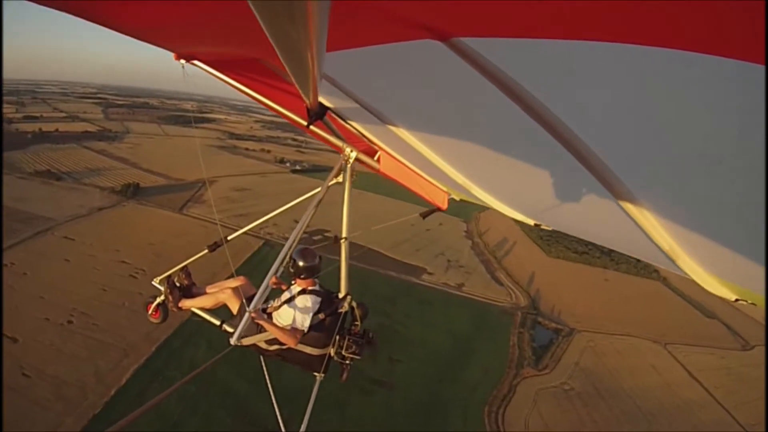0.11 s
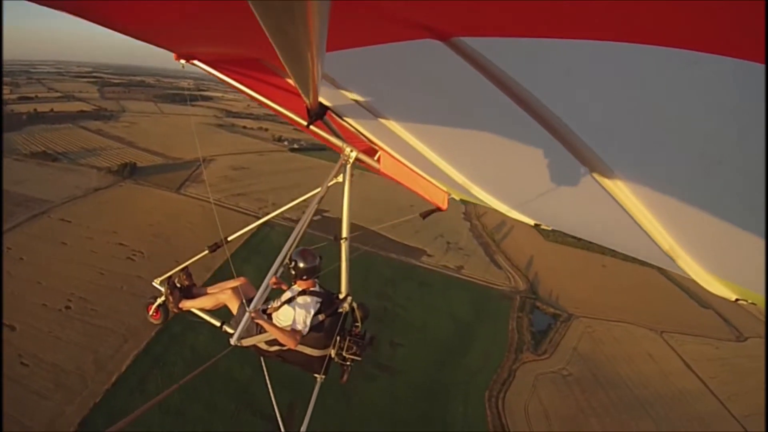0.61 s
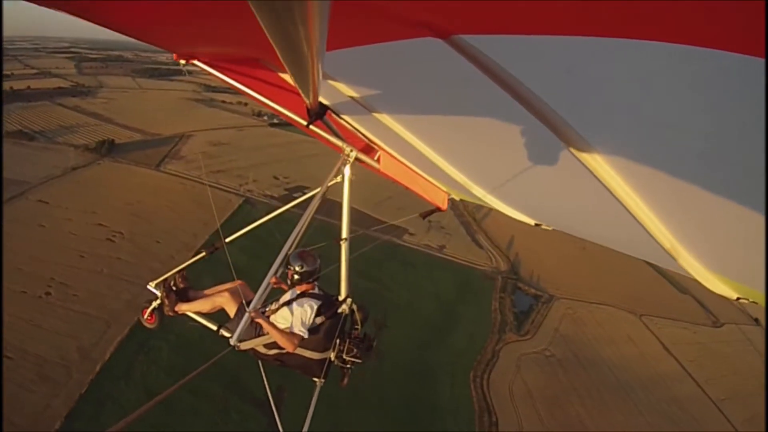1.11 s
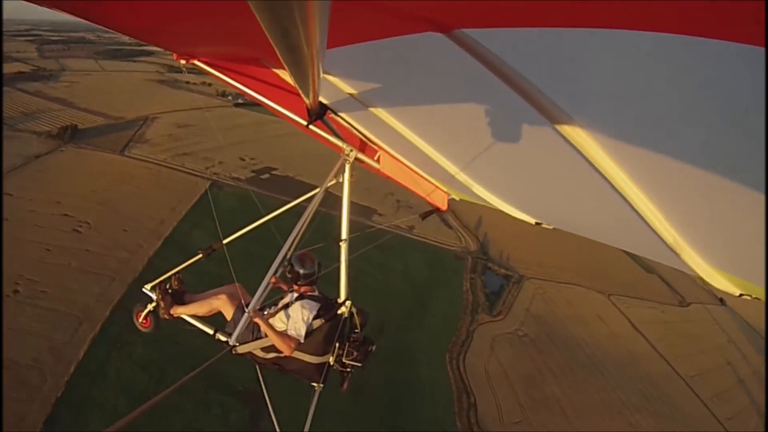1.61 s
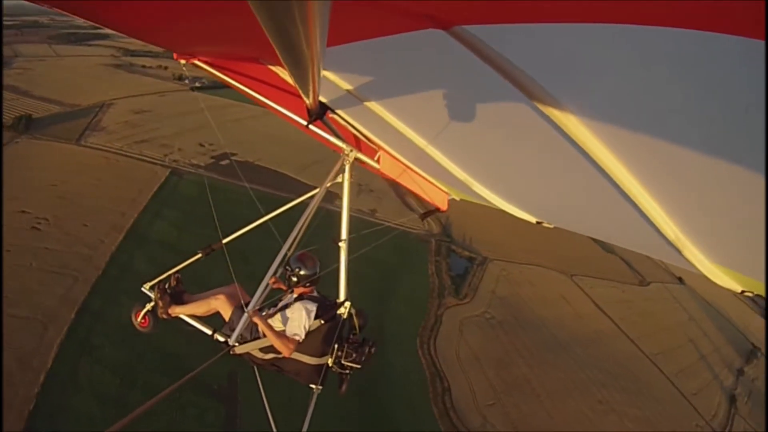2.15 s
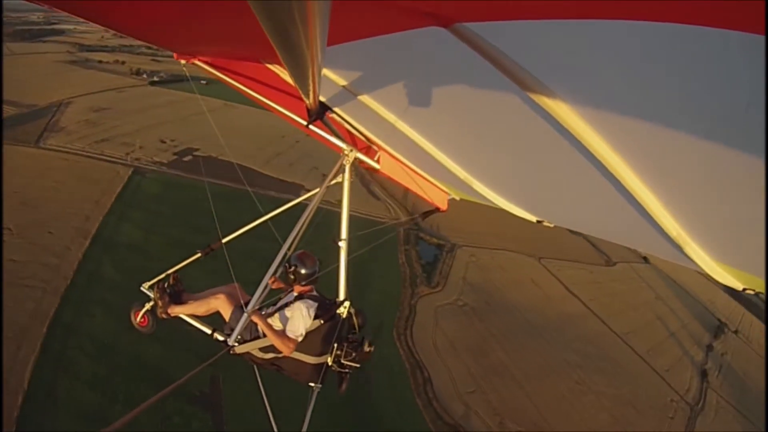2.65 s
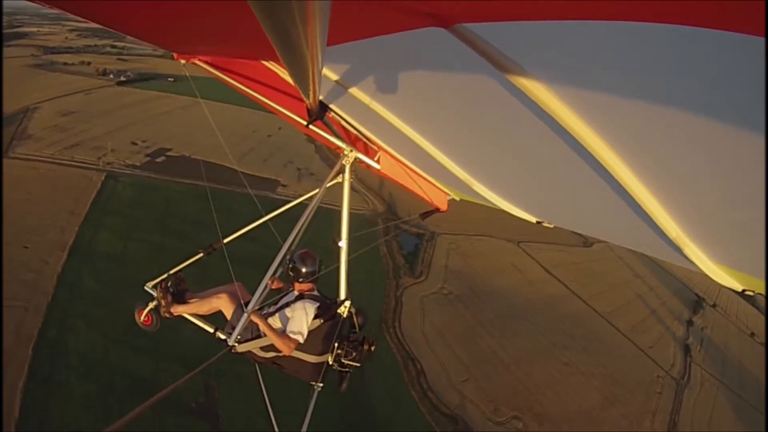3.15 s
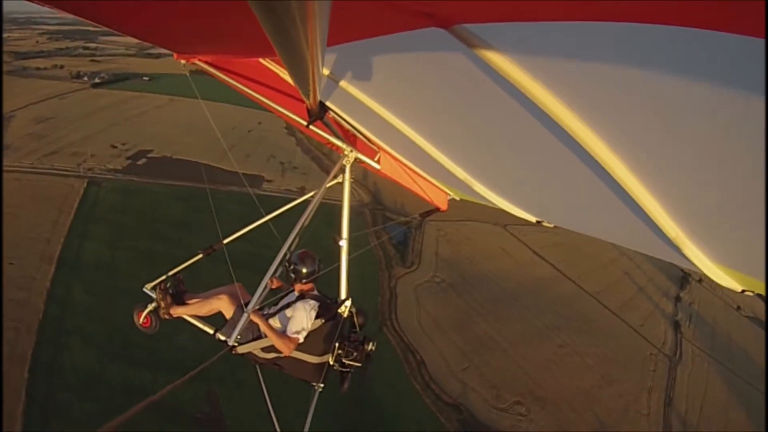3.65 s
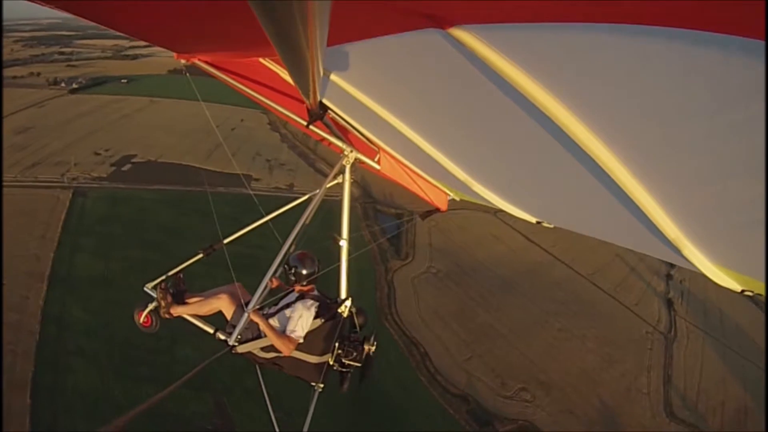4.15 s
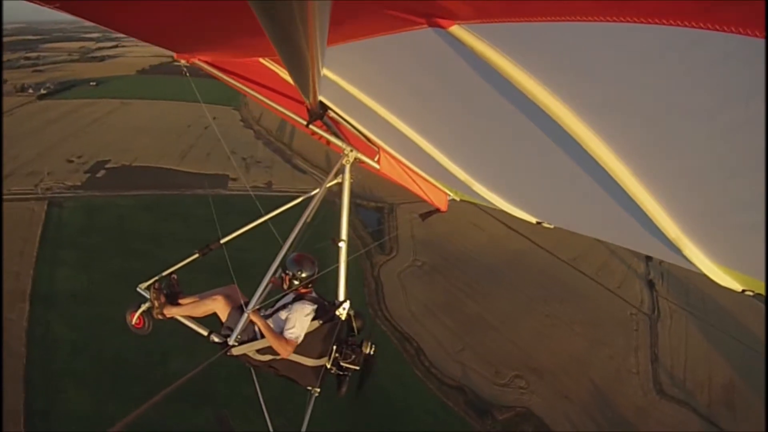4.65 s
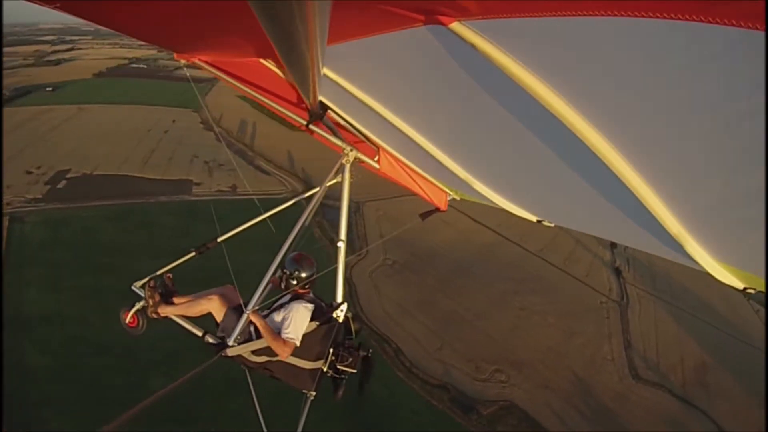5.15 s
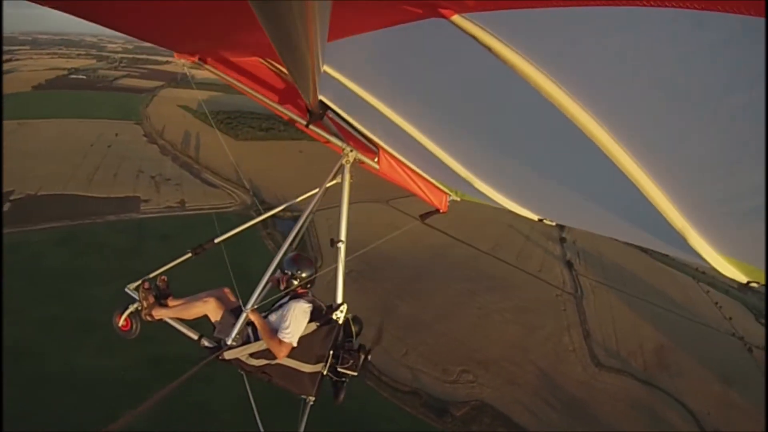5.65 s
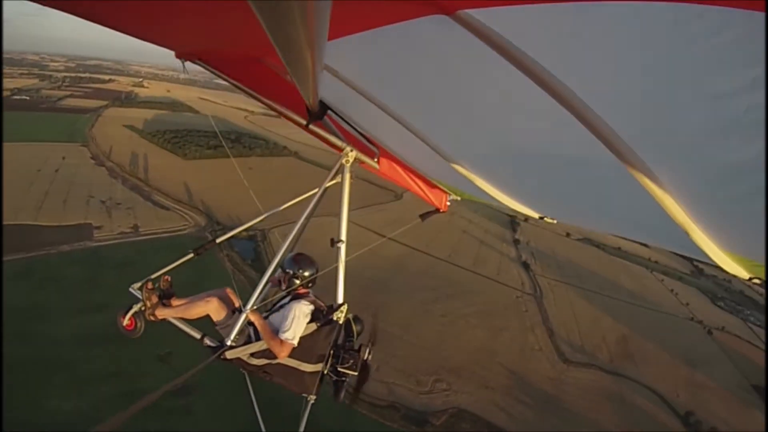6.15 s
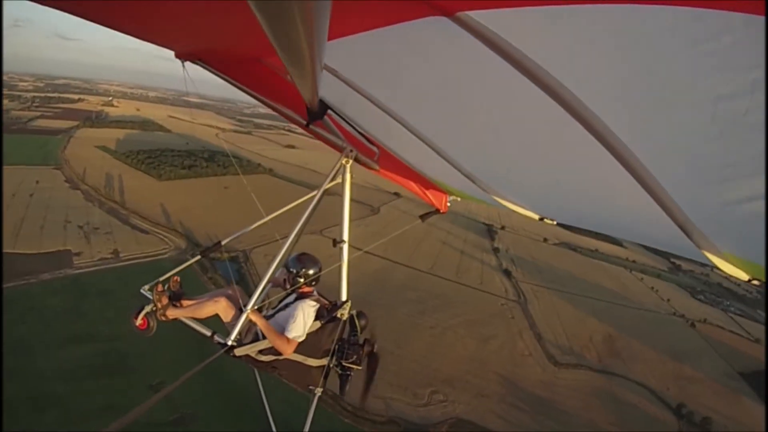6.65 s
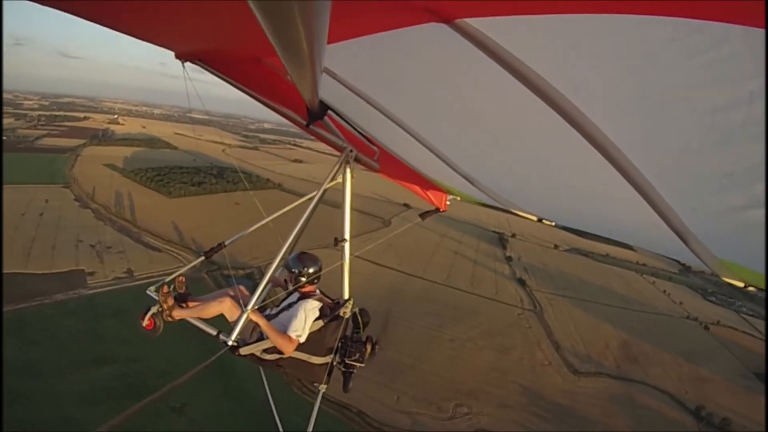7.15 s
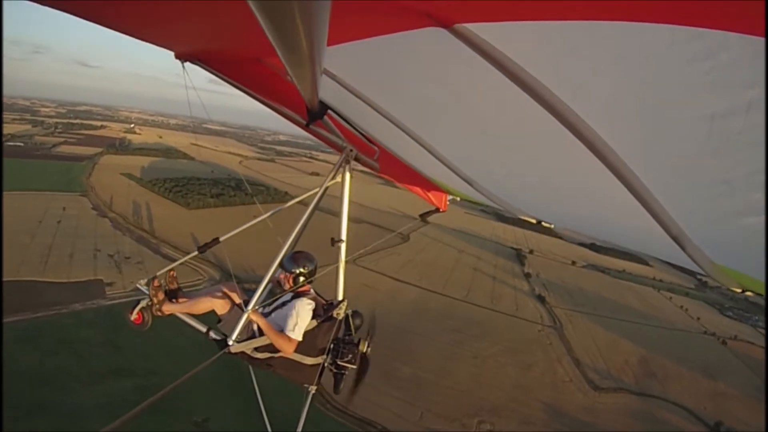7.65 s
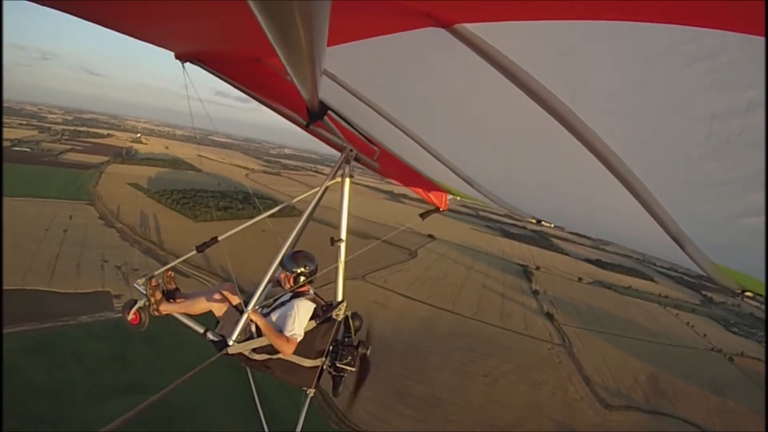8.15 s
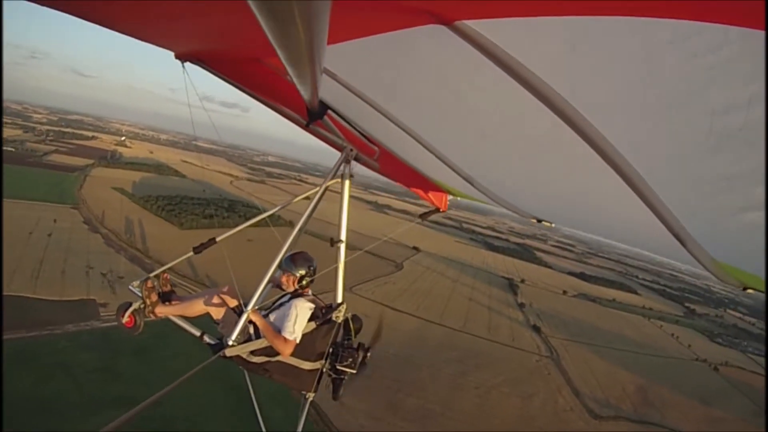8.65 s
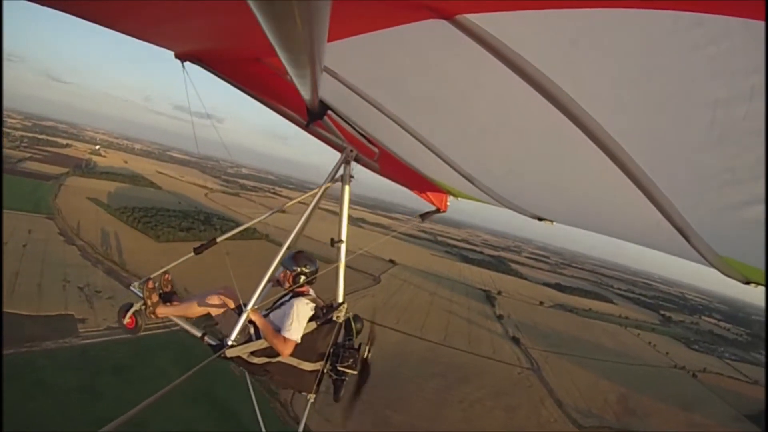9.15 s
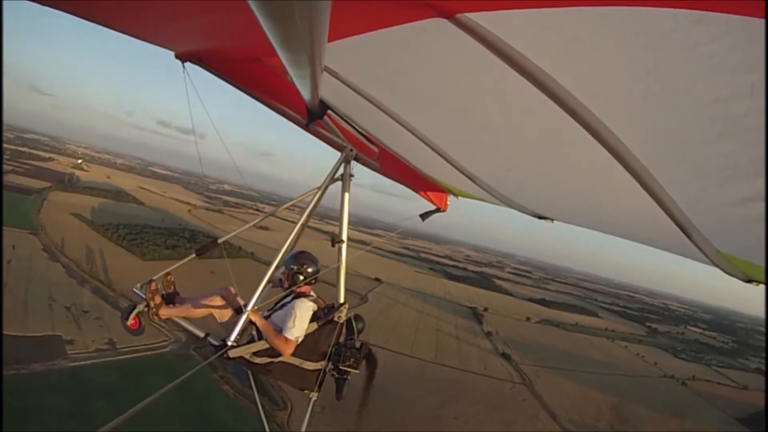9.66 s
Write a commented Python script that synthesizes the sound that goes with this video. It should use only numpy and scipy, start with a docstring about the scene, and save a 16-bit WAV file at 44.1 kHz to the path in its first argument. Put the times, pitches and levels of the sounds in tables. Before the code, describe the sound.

Heavy constant bass hum of a small aircraft engine in flight, heard by an enclosed microphone, with wavering overtones and quiet airflow underneath.

```python
"""In flight on the wing frame of a small aircraft, an enclosed microphone hears engine and propeller drone.
One strong low tone is a sinusoid at the firing rate, with overtones that swell and waver on its multiples.
Noise and uneven knocks, rung through resonances, make the housing's rasp; shaped noise makes the airflow.
Wind rumbles below, gusts bring hiss, a buzz and howl come and go, and faint ticks fall near the low
tone's crests and troughs."""
import sys
import numpy as np
from scipy import signal
from scipy.fft import rfft, irfft, next_fast_len
from scipy.io import wavfile
from scipy.ndimage import uniform_filter1d, map_coordinates

SR = 44100
rng = np.random.default_rng(int(sys.argv[2]) if len(sys.argv) > 2 else 0)


def volts_from_db(level):
    """Convert decibel levels to linear amplitude ratios."""
    exponent = np.asarray(level, float) / 20
    return 10 ** exponent


def output_pcm(signal):
    """Save a mono or channel-first signal as 16-bit PCM at the path in sys.argv[1].

    Samples are clipped to [-1, 1] before scaling.
    """
    pcm = np.clip(np.atleast_2d(signal).T, -1, 1) * 32767
    wavfile.write(sys.argv[1], SR, np.round(pcm).astype(np.int16))


N = 431298  # length in samples

# Pace of the engine. Each row: time in seconds, firing rate in Hz.
FIRING_RATE = [(0.0, 96.08), (0.42, 96.2), (0.7, 95.45), (1.7, 95.69), (2.3, 95.55), (3.05, 96.04),
               (3.55, 95.25), (4.35, 95.53), (4.7, 95.19), (4.95, 95.63), (5.3, 94.77), (6.0, 94.45),
               (6.2, 95.48), (6.45, 94.75), (7.05, 95.17), (7.45, 94.54), (7.8, 95.05), (8.2, 94.8),
               (9.1, 94.52), (9.78, 95.1)]
# Loudness of the low tone, before a slight waver. Each row: time in seconds, rms level in dB.
LOW_TONE_LEVEL = [(0.05, -7.5), (1.4, -8), (1.55, -8), (3.3, -8), (3.9, -9), (4.1, -9.5), (4.47, -9.5),
                  (4.58, -7), (5.0, -9.5), (5.2, -8.5), (5.85, -7.9), (6.0, -9.5), (6.3, -9.5),
                  (6.45, -8.9), (6.97, -9.5), (7.2, -8), (7.42, -8), (7.55, -8.8), (7.9, -8), (9.7, -8)]
# Main overtones at rest, before wavering. Each row: multiple of the firing rate, rms level in dB,
# phase against the low tone in radians.
MAIN_OVERTONES = [(2, -38.5, 2.5), (3, -47, -1.0), (4, -53, 0.15), (12, -52, 0.1), (13, -52.5, 0.14),
                  (33, -76, 0)]
# Arches of power added to a main overtone. Each row: multiple of the firing rate, start in seconds,
# length in seconds, peak in dB.
OVERTONE_SWELLS = [(2, .5, .45, -33), (2, 1.1, .35, -28), (2, 1.35, 0.27, -24), (2, 1.55, .62, -28),
                   (2, 2.25, .8, -24.5), (2, 3.33, .8, -23), (2, 3.84, 0.95, -20), (2, 4.6, 0.71, -20.5),
                   (2, 5.2, 0.45, -27), (2, 5.7, 0.34, -32.5), (2, 5.95, 0.513, -18.5), (2, 6.5, .55, -26),
                   (2, 6.9, .47, -22.5), (2, 7.6, .45, -31), (2, 8.3, 0.36, -30), (2, 8.7, 0.25, -30),
                   (2, 9.05, .7, -31.5), (3, .65, 0.64, -41), (3, 1.4, 0.52, -40), (3, 1.9, .4, -43),
                   (3, 2.6, 0.49, -37.5), (3, 3.65, 1.1, -41.5), (3, 4.7, .75, -37.5), (3, 6.05, .3, -36.5),
                   (3, 6.5, 0.66, -38.5), (3, 7.1, 0.42, -36.5), (3, 7.39, 1.68, -36), (3, 8.85, 1.1, -31),
                   (4, 1.0, .45, -44.5), (4, 1.5, .85, -37.5), (4, 2.55, 0.44, -43.5),
                   (4, 3.15, 0.91, -35.5), (4, 3.8, .85, -35), (4, 5.8, 0.74, -36.5), (4, 6.85, .55, -43),
                   (4, 7.75, .95, -42.5), (4, 9.2, .35, -47.5), (12, .2, .4, -46), (12, 0.63, .95, -39.5),
                   (12, 1.6, .9, -42), (12, 2.2, .6, -44), (12, 3.05, 0.57, -32.5), (12, 3.5, 1.2, -40.5),
                   (12, 4.6, 0.67, -42.5), (12, 6.05, 0.21, -36.5), (12, 7.7, .3, -43), (13, .5, 1.1, -45),
                   (13, 1.6, .5, -38.5), (13, 2.29, .3, -37), (13, 2.65, 0.47, -45), (13, 3.37, .45, -35),
                   (13, 3.9, 1.05, -46), (13, 6.05, .45, -45.5), (13, 9.0, 0.91, -48.5),
                   (33, .9, 1.4, -66.5), (33, 2.2, 1.6, -68), (33, 3.7, 1.6, -71), (33, 6.9, 1.1, -70)]
# Weaker, unsteady shaft orders, before shaking and wavering. Each row: multiple of the firing rate,
# rms level in dB.
FAINT_ORDERS = [(.5, -47.5), (1.5, -54), (2.5, -54.5), (3.5, -49.5), (4.5, -59.5), (5, -55.5), (6, -57),
                (6.5, -58), (7, -55), (9, -63), (10, -56.5), (10.5, -56.5), (11, -52.5), (14, -58),
                (15, -53.5), (16, -54.5), (34, -72.5), (49, -77.5)]
# How hard the air shakes the frame. Each row: time in seconds, shaking in dB.
FRAME_SHAKE = [(0.05, -1), (0.6, -1.5), (1.35, 3), (1.65, 0.6), (2.3, 0.2), (2.6, 2), (2.85, 0.6),
               (3.45, 3.5), (3.95, 0), (4.2, 1.5), (4.75, -2.5), (5.05, -0.5), (5.33, -4.5), (5.6, -0.5),
               (5.9, -2), (6.26, 7.5), (6.49, -3), (6.78, -6), (7.2, 3), (7.48, -2.5), (7.9, 0.1), (8.3, 0),
               (8.55, -4), (8.82, 1.2), (9.0, -1.5), (9.35, 0.8), (9.72, 0.5)]
# Gusts on the housing, before each layer's own offset. Each row: start in seconds, length in seconds,
# peak in dB.
HOUSING_GUSTS = [(1.0, 0.56, -41.5), (1.62, .22, -40.5), (2.7, 0.3, -39), (5.3, .4, -45), (6.12, 0.27, -40),
                 (7.0, .45, -36.5), (7.7, .55, -42.5), (9.1, .35, -44.5)]
# Bursts of buzz and howl, before each layer's own offset. Each row: start in seconds, length in seconds,
# peak in dB.
BUZZ_BURSTS = [(5.45, 0.54, -66.5), (5.85, .6, -60), (8.68, .3, -63.5), (9.049, .75, -64.5)]
# Narrow resonances of housing and frame that stand out of the rasp. Each row: centre in Hz, width in Hz,
# gain in dB.
HOUSING_MODES = [(756, 61, 5), (1375, 47, 5.5), (1443, 31, 4), (1550, 30, 8), (1690, 41, 4.5),
                 (1800, 85, 7.5), (1934, 63, 7.5), (2197, 45, 7), (2400, 50, 5), (2640, 71, 5)]
# Colour of the engine rasp. Each row: frequency in Hz, relative gain in dB.
RASP_COLOUR = [(260, -36), (450, -6), (522, -13.5), (702, -3), (833, -13.5), (1130, 3), (1310, -3.5),
               (1490, -3), (1650, -8.5), (1900, -5.5), (2460, -11.5), (2900, -29), (3770, -60.5),
               (6380, -120)]
# Colour of the airflow hiss. Each row: frequency in Hz, relative gain in dB.
HISS_COLOUR = [(2300, -120), (2700, -14), (2950, -9.5), (3170, -0.5), (3400, -2), (3900, -5.5),
               (4300, -12.5), (4550, -11.5), (4670, -5.5), (4800, -13.5), (5500, -14.5), (8000, -21),
               (10000, -41.5), (16000, -75)]
# Colour of the wind rumble. Each row: frequency in Hz, relative gain in dB.
RUMBLE_COLOUR = [(60, -120), (120, -9.5), (170, 2.5), (230, -1.5), (320, 2), (430, -8), (560, -15),
                 (800, -30.5), (1500, -120)]
# Colour of the deepest wind buffeting. Each row: frequency in Hz, relative gain in dB.
BUFFET_COLOUR = [(12, -31.5), (25, -10.5), (45, -4.5), (68, 2), (125, -3), (160, -13), (220, -42),
                 (400, -120)]
# Colour of the buzz. Each row: frequency in Hz, relative gain in dB.
BUZZ_COLOUR = [(1000, -120), (3900, -12.5), (4120, 0.5), (4350, -13.5), (4750, -1), (5250, -1), (5450, -11),
               (7000, -14.5), (7450, -10), (8200, -19.5), (12000, -36.5), (16000, -59)]
# Colour of the howl. Each row: frequency in Hz, relative gain in dB.
HOWL_COLOUR = [(900, -120), (1250, -18.5), (1380, -5.5), (1450, 0), (1540, -3.5), (1640, -19.5),
               (2200, -120)]
# Colour of the ticks. Each row: frequency in Hz, relative gain in dB.
TICK_COLOUR = [(1200, -120), (2200, -4), (3000, 2), (6000, -4.5), (8000, -4), (10000, -11.5), (12000, -19),
               (16000, -35.5)]
# Where ticks tend to fall. Each row: place in cycles after the low tone's crest, base chance per cycle.
TICK_SPOTS = [(0.101, .2), (0.371, .1), (.6, 0.25), (.88, .1)]


def unit(x):
    """Scale to rms 1."""
    return x / np.sqrt(np.mean(x ** 2) + 1e-20)


def curve(rows):
    """Join (seconds, value) points into one value per sample."""
    seconds, values = np.transpose(rows)
    return np.interp(np.arange(N) / SR, seconds, values)


def wobble(rate):
    """A smooth random curve with the given number of knots a second."""
    return map_coordinates(rng.standard_normal(N // 200), [np.arange(N) * rate / SR])


def swollen(rest_db, swells):
    """A level in dB that rises from rest as (start, length, peak dB) arches add power."""
    t = np.arange(N) / SR
    squareness = 0.7  # under 1 an arch has a broad top and steep ends
    power = volts_from_db(2 * rest_db) + np.zeros(N)
    for start, length, peak_db in swells:
        progress = np.clip((t - start) / length, 0, 1)
        power += volts_from_db(2 * peak_db) * np.abs(np.sin(np.pi * progress)) ** (2 * squareness)
    return 10 * np.log10(power)


def tone(angle, db):
    """A sinusoid of the given rms level."""
    return np.sqrt(2) * volts_from_db(db) * np.cos(angle)


def coloured(x, colour):
    """Filter x through (Hz, dB) points joined on a log frequency axis."""
    size = next_fast_len(N + SR // 4)
    hz, db = np.transpose(colour)
    log_f = np.log(np.fft.rfftfreq(size, 1 / SR) + 1)
    gain = volts_from_db(np.interp(log_f, np.log(hz), db))
    return irfft(rfft(x, size) * gain, size)[:N]


def resonant(x, modes):
    """Add the ringing of (Hz, width, dB) resonances to x, then scale to rms 1."""
    size = next_fast_len(N + SR // 4)
    f = np.fft.rfftfreq(size, 1 / SR)
    gain = 1
    for centre, width, db in modes:
        band = 1j * f * width
        gain = gain + (volts_from_db(db) - 1) * band / (centre * centre - f * f + band)
    return unit(irfft(rfft(x, size) * gain, size)[:N])


def rush(colour, patchy_db):
    """Coloured noise of rms 1, with random gain in patches of time and frequency."""
    z = signal.stft(rng.standard_normal(N), nperseg=512)[2]
    field = uniform_filter1d(rng.standard_normal(z.shape), size=4, axis=0)
    field = uniform_filter1d(field, size=12, axis=1)
    noise = signal.istft(z * volts_from_db(patchy_db * unit(field)), nperseg=512)[1][:N]
    return unit(coloured(noise, colour))


def knocks(angle, place, jitter, spread_db):
    """One uneven knock per firing; place and jitter are in cycles."""
    cycles = angle / (2 * np.pi)
    whole = np.arange(int(cycles[-1]))
    scatter, size = rng.standard_normal((len(whole), 2)).T
    at = np.searchsorted(cycles, whole + place + jitter * scatter)
    train = np.zeros(N)
    train[np.clip(at, 0, N - 1)] = volts_from_db(spread_db * size)
    return train


def drone(angle):
    """Low tone and main overtones waver, swell and drift in phase as their paths through air and frame change."""
    sound = tone(angle + 0.016 * wobble(6.6), curve(LOW_TONE_LEVEL) + 0.2 * wobble(12))
    for k, rest_db, phase in MAIN_OVERTONES:
        k = round(k)
        swells = [row[1:] for row in OVERTONE_SWELLS if round(row[0]) == k]
        level_db = swollen(rest_db + 3.0 * wobble(5), swells) + 0.9 * wobble(15)
        drift = 0.08 * k * wobble(3)
        sound += tone(k * angle + phase + drift, level_db)
    return sound


def faint_orders(angle):
    """Many faint shaft orders come and go, the higher the more blurred in phase."""
    shake_db = 0.45 * curve(FRAME_SHAKE)  # the frame passes more of them when the air shakes it
    sound = np.zeros(N)
    for k, db in FAINT_ORDERS:
        blur = 0.9 * wobble(4) + 0.07 * k * wobble(18)
        sound += tone(k * angle + blur, db + shake_db + 2.8 * wobble(4))
    return sound


def rasp(angle):
    """Exhaust noise and knocks ring the housing and swell once per firing."""
    beats = unit(coloured(knocks(angle, 0.58, jitter=0.03, spread_db=3.5), RASP_COLOUR))
    exhaust = rush(RASP_COLOUR, patchy_db=1.48) + 0.35 * beats
    level_db = -37.5 + curve(FRAME_SHAKE) + 1.0 * np.cos(angle - 3.8) + 0.26 * wobble(10)
    return volts_from_db(level_db) * resonant(exhaust, HOUSING_MODES)


def hiss(angle):
    """Airflow noise grows with shaking and gusts and swells once per firing."""
    rest_db = -62.5 + 0.8 * curve(FRAME_SHAKE) + 0.6 * wobble(2.5)
    level_db = swollen(rest_db, np.add(HOUSING_GUSTS, [0, 0, -23]))
    level_db = level_db + 1.7 * np.cos(angle - 3.7) + 0.59 * wobble(10)
    return volts_from_db(level_db) * rush(HISS_COLOUR, patchy_db=-1.5)


def rumble():
    """Wind on the housing is low noise that grows with shaking and gusts."""
    rest_db = -39 + 0.35 * curve(FRAME_SHAKE)
    level_db = swollen(rest_db, np.add(HOUSING_GUSTS, [0, 0, 4.5]))
    return volts_from_db(level_db + 0.8 * wobble(8.9)) * rush(RUMBLE_COLOUR, patchy_db=1.5)


def buffet():
    """The deepest wind noise wavers both slowly and quickly."""
    level_db = -34 + 1.1 * wobble(1.0) + 1.1 * wobble(9.9)
    return volts_from_db(level_db) * rush(BUFFET_COLOUR, patchy_db=1.5)


def buzz_and_howl(angle):
    """A buzz of knocks and noise and a howl of noise share their bursts and grow with shaking."""
    shared_db = swollen(-74.5 + 0.7 * curve(FRAME_SHAKE), BUZZ_BURSTS)
    beats = unit(coloured(knocks(angle, 0.6, jitter=0.012, spread_db=3.0), BUZZ_COLOUR))
    chatter = unit(beats + 0.64 * rush(BUZZ_COLOUR, patchy_db=1.5))
    buzz = volts_from_db(shared_db + 1.5 + 0.8 * wobble(12)) * chatter
    howl = volts_from_db(shared_db + 22.5 + 1.2 * wobble(9.9)) * rush(HOWL_COLOUR, patchy_db=0.8)
    return buzz + howl


def ticks(angle):
    """Small sudden steps of pressure, in loose bunches, tied to the swing of the low tone."""
    cycles = angle / (2 * np.pi)
    whole = np.arange(int(cycles[-1]))
    steps = np.zeros(N)
    busy = volts_from_db(3 * wobble(9.7))  # raises and lowers the chance of a tick
    for place, chance in TICK_SPOTS:
        scatter = rng.standard_normal(len(whole))
        size = volts_from_db(4.2 * np.clip(rng.standard_normal(len(whole)), -3, 1.4))
        dice = rng.random(len(whole))
        at = np.clip(np.searchsorted(cycles, whole + place + 0.048 * scatter), 0, N - 1)
        direction = np.sign(np.cos(angle[at]))  # up near a crest, down near a trough
        steps[at] += (dice < chance * busy[at]) * direction * size
    staircase = np.cumsum(steps)
    level = staircase - np.linspace(0, staircase[-1], N)  # take out the overall slope
    return volts_from_db(-61.5) * unit(coloured(level, TICK_COLOUR))


def scene():
    """The firing of the engine paces the tones, rasp, hiss, buzz and ticks; the wind blows freely."""
    angle = -2.1 + 2 * np.pi * np.cumsum(curve(FIRING_RATE)) / SR  # radians
    engine = drone(angle) + faint_orders(angle) + rasp(angle)
    air = hiss(angle) + rumble() + buffet() + buzz_and_howl(angle)
    return (engine + air + ticks(angle))[None]


def roll_off(x):
    """The treble ends steeply here."""
    return signal.sosfilt(signal.butter(12, 15830, fs=SR, output="sos"), x)


def record(dry):
    """The mix is finished as it stands, in mono."""
    return roll_off(dry)


dry = scene()
out = record(dry)
output_pcm(out)
```